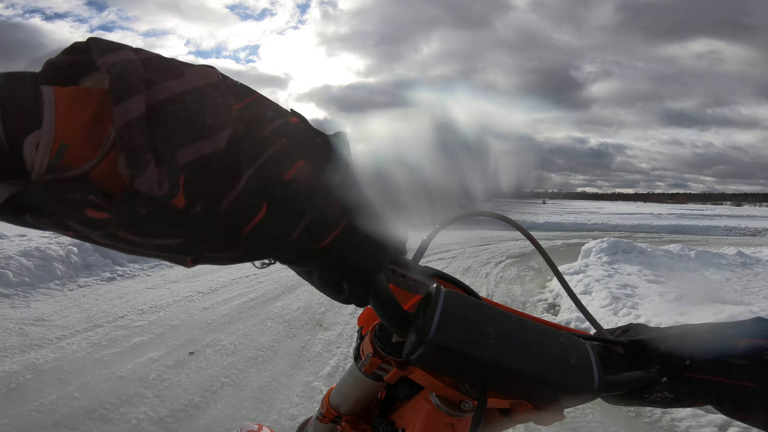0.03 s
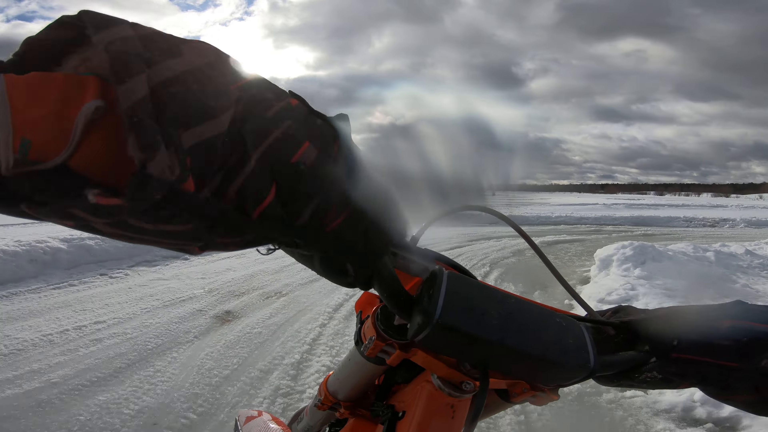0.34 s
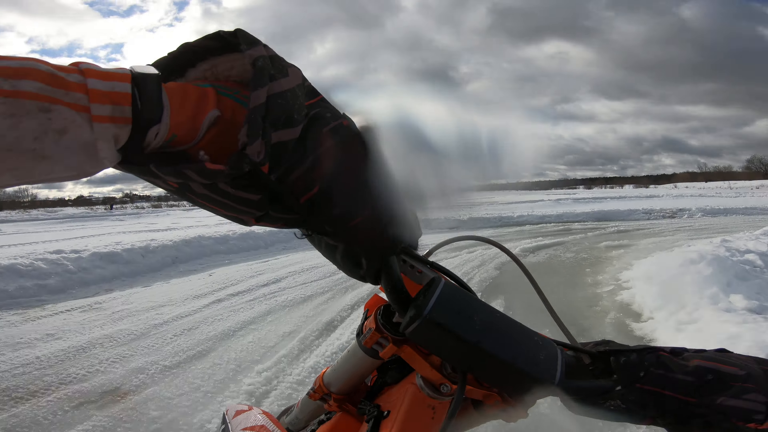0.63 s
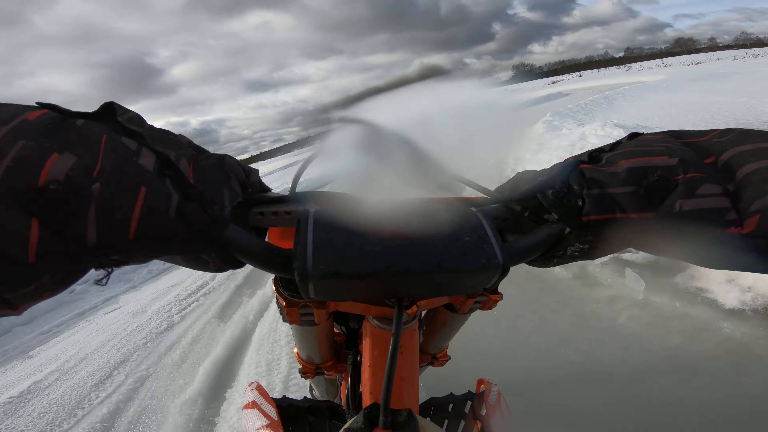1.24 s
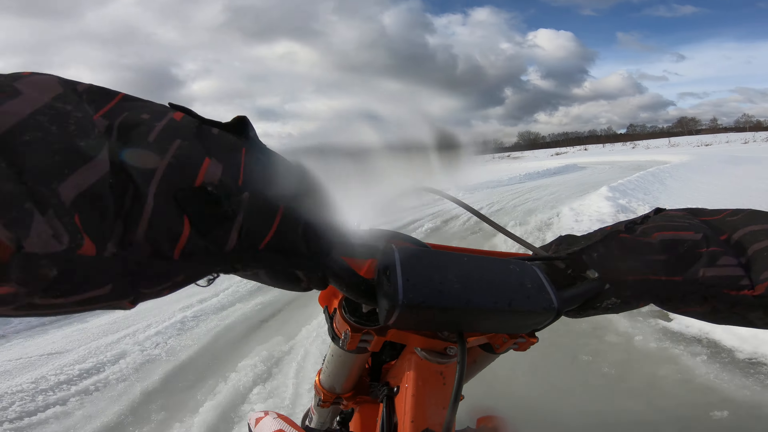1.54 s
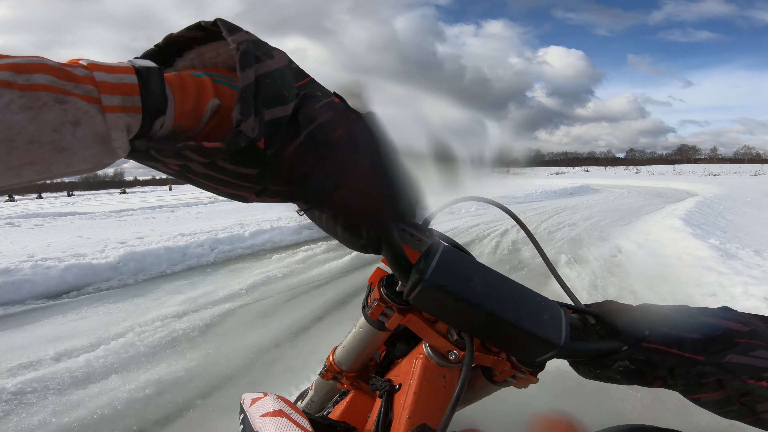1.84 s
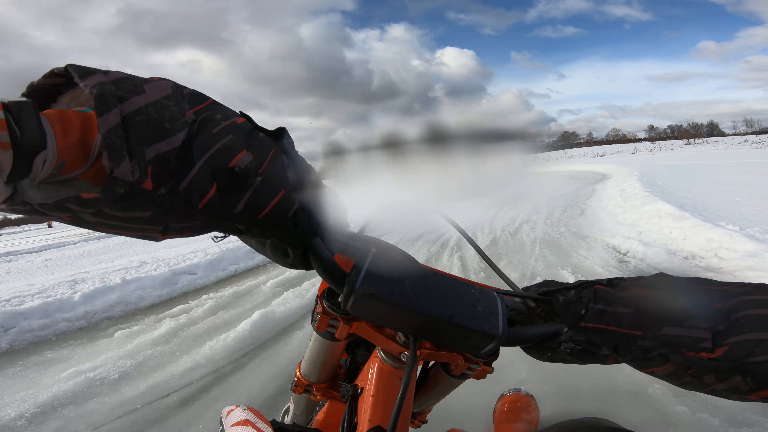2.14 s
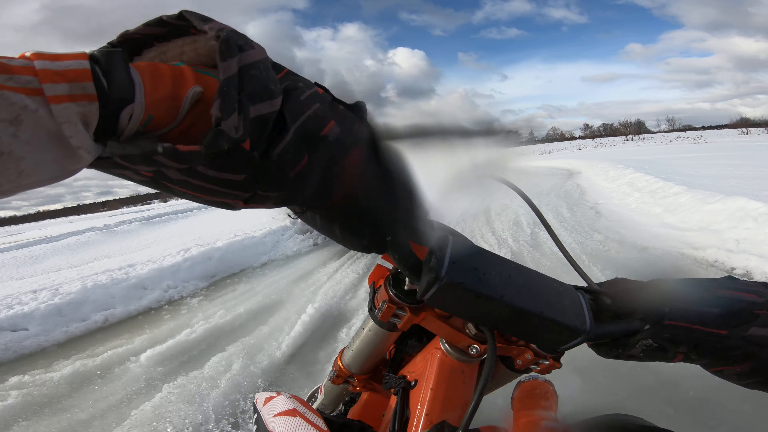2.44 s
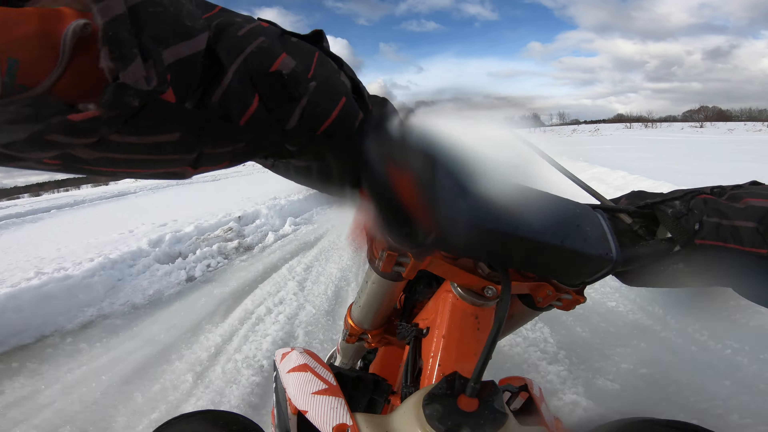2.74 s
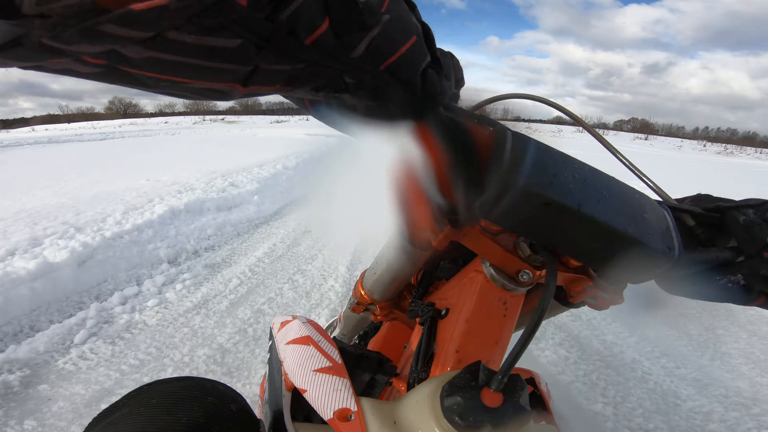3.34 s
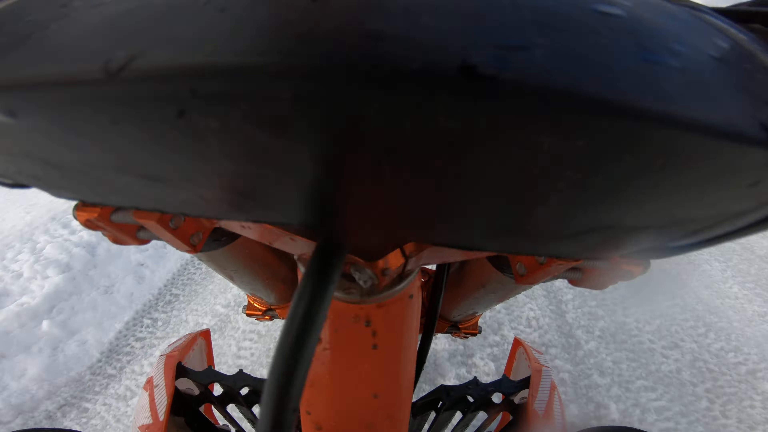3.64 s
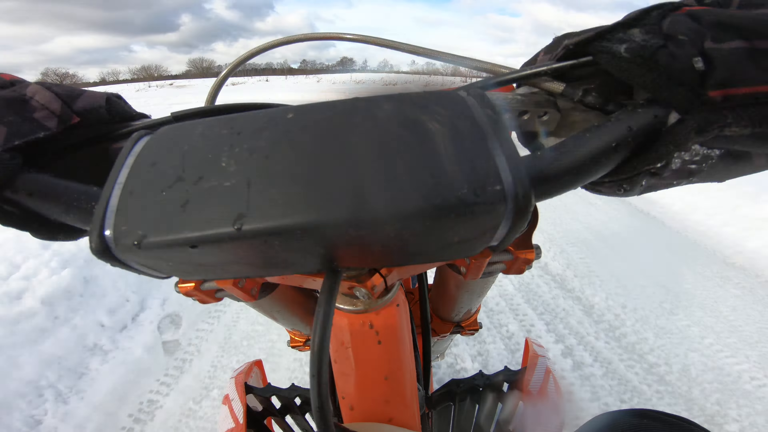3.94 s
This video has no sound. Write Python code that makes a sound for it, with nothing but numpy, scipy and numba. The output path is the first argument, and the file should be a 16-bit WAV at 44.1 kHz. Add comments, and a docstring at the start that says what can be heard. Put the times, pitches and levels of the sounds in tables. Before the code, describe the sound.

A dirt bike engine thumps through a bend, then revs up hard on ice.

```python
"""On an ice track, heard from the chest of a rider on a single-cylinder four-stroke dirt bike.
The exhaust thumps through a bend on short blips of throttle, then the bike pulls away with a hollow
drone from its air intake. The valve gear clatters and the engine's metal cases ring. Studded tyres
scrape and skid on the ice, the frame knocks over ruts and wind buffets the microphone."""
import sys
import numpy as np
from scipy import signal
from scipy.fft import rfft, irfft
from scipy.io import wavfile
from scipy.ndimage import uniform_filter1d, minimum_filter1d
from numba import njit

SR = 44100
rng = np.random.default_rng(int(sys.argv[2]) if len(sys.argv) > 2 else 0)


def transcribe(u):
    """Save the signal u as a 16-bit wav file named by the first command-line argument.

    u: samples, shape (n,) or (channels, n), limited to [-1, 1]; the rate is SR.
    q: integer samples, one column per channel.
    """
    v = np.clip(np.atleast_2d(u).T, -1, 1)
    q = np.round(v * 32767).astype(np.int16)
    wavfile.write(sys.argv[1], SR, q)


N = 176400  # 4 seconds

# Engine speed; one cycle is one firing and two turns of the crank: time_s, firings_per_s
ENGINE_SPEED = [(0.0, 29.71), (0.15, 30.25), (0.29, 35.62), (0.47, 33.31), (0.6, 27.96), (0.75, 26.97),
                (0.91, 35.13), (1.15, 35.09), (1.38, 30.55), (1.57, 30.05), (1.75, 30.62), (1.98, 33.8),
                (2.14, 33.02), (2.3, 35.74), (2.47, 36.17), (2.58, 40.13), (2.7, 38.77), (2.84, 38.43),
                (2.95, 44.95), (3.1, 45.6), (3.24, 45.11), (3.34, 48.98), (3.46, 53.58), (3.6, 54.74),
                (3.78, 57.74), (3.9, 59.51), (4.0, 59.12)]

# How loud each engine sound is: time_s, level_db
BOOM_LEVEL = [(0, -14.5), (.18, -15.5), (.3, -27), (.43, -20.5), (.58, -14), (.78, -16.5), (.92, -19.5),
              (1.15, -24), (1.25, -32.5), (1.5, -19.5), (1.8, -20.5), (2.3, -24), (2.6, -25), (3.3, -26),
              (3.6, -62), (4, -30)]  # exhaust, at each firing
THROB_LEVEL = [(0, -27.5), (.18, -22.5), (.31, -15.5), (.47, -14), (.6, -46), (.8, -17.5), (.95, -17),
               (1.15, -16), (1.28, -23.5), (2, -22), (2.55, -18), (3, -32.5), (3.6, -20), (4, -19.5)]  # exhaust, at each crank turn
HUM_LEVEL = [(2.3, -63), (2.6, -17.5), (2.95, -18.5), (3.3, -16.5), (3.6, -18.5), (4, -19.5)]  # exhaust, pulling steadily
GROWL_LEVEL = [(2.4, -62), (2.6, -40), (2.85, -37), (3.15, -38), (3.4, -42), (3.6, -31), (3.78, -30),
               (3.93, -31), (4, -35)]  # exhaust, working hard
BARK_LEVEL = [(0, -37), (.16, -35.5), (.25, -21.5), (.4, -21), (.55, -28.5), (.75, -34), (.9, -23.5),
              (1.1, -18), (1.21, -17.5), (1.35, -27), (1.75, -33), (1.88, -21), (2.1, -25.5), (2.4, -25.5),
              (2.55, -21), (2.75, -23), (3.2, -31.5), (3.6, -22), (4, -28)]  # intake, throttle partly open
DRONE_LEVEL = [(2.3, -46), (2.52, -25), (2.66, -18), (2.8, -13.5), (2.88, -12), (2.97, -15), (3.07, -14),
               (3.2, -9), (3.34, -9), (3.48, -10.5), (3.57, -13), (3.75, -13), (3.9, -11), (4, -15)]  # intake, throttle wide open
CLATTER_LEVEL = [(0, -68), (.3, -45), (.7, -54.5), (1, -46.5), (1.4, -49.5), (1.75, -54.5), (2, -48.5),
                 (2.5, -42.5), (2.85, -44.5), (3.1, -38.5), (3.35, -43), (3.55, -35), (3.75, -36),
                 (3.92, -35), (4, -48)]  # valve gear
CASE_LEVEL = [(0, -58), (2.5, -54), (2.9, -46), (3.4, -50), (3.6, -41), (3.78, -37), (3.93, -37), (4, -42)]  # metal engine cases

# The intake's bark, rising with each blip of throttle: time_s, pitch_hz
BARK_PITCH_CURVE = [(0, 278), (.2, 285), (.36, 320), (.48, 343), (.57, 293), (.72, 305), (.8, 358),
                    (.95, 346), (1.15, 301), (1.45, 325), (1.62, 298), (1.95, 323), (2.23, 306),
                    (2.45, 352), (2.7, 320), (3.6, 341.6)]
# The note of the airbox, the chamber the engine breathes through: time_s, pitch_hz, width_hz
AIRBOX_NOTE = [(2.6, 278, 50), (2.84, 274, 45), (2.96, 294, 70), (3.12, 288, 70), (3.24, 282, 68),
               (3.44, 298, 74), (3.6, 298, 100), (3.88, 282, 90), (4, 250, 90)]
# The notes the engine cases ring at: pitch_hz, width_hz, gain_db
CASE_NOTES = [(1060, 60, -1), (1312, 55, 5), (1660, 70, -2), (1900, 70, -10), (2540, 130, -9),
              (2815, 60, -8), (3740, 130, -18), (5800, 170, -22)]
# Tyres rolling on ice: time_s, scrape_db, crunch_db, spray_db
TYRE_LEVELS = [(0, -51, -63, -48), (.35, -48.5, -57.5, -57), (.6, -43.5, -60.5, -56),
               (.95, -46.5, -70.5, -49), (1.15, -43, -61.5, -50.5), (1.4, -46.5, -59.5, -59.5),
               (1.58, -45.5, -58, -53.5), (1.68, -44, -58, -50.5), (1.95, -39.5, -46.5, -48.5),
               (2.15, -40.5, -49, -56), (2.45, -35.5, -43, -56), (2.65, -34, -49, -55),
               (2.85, -35, -49, -59), (3.05, -35, -44.5, -54.5), (3.35, -39, -50.5, -51),
               (3.55, -34.5, -50, -51), (3.75, -39, -47, -49), (4, -35, -51.5, -46.5)]
# Tyres sliding: time_s, pitch_hz, width_hz, level_db
TYRE_SKID = [(0, 1150, 450, -52), (.3, 1150, 400, -46), (.55, 1200, 400, -52), (.7, 1200, 350, -45),
             (.82, 1100, 450, -49), (.97, 1130, 400, -41.5), (1.15, 1080, 450, -47), (1.4, 1100, 400, -62),
             (2.7, 1090, 120, -56), (2.85, 1090, 70, -40), (3.0, 1090, 90, -45), (3.15, 1070, 60, -42),
             (3.22, 1030, 60, -46), (3.3, 1020, 50, -38.5), (3.42, 1010, 70, -54), (3.6, 1010, 70, -65)]
# Knocks over ruts: start_s, blow_db, rattle_db, rattle_decay_s
RUT_KNOCKS = [(1.277, -14, -38, .004), (1.663, -7, -39, .003), (1.81, -18, -37, .009),
              (1.907, -13, -34, .007), (2.632, -10, -25, .03), (2.735, -18, -32, .022),
              (2.838, -10, -29, .006), (3.057, -12, -32, .004), (3.51, -10, -27, .03),
              (3.546, -9, -26, .035), (3.64, -9, -32, .005), (3.745, -6, -25, .005)]
# Wind on the microphone: time_s, level_db
WIND_LEVEL = [(0, -29), (.4, -25), (.7, -27), (1.1, -23), (1.35, -26), (1.7, -21), (2.25, -19), (2.55, -22),
              (2.7, -26), (2.84, -21), (2.95, -28), (3.45, -30), (3.57, -19.5), (3.7, -26), (3.8, -20.5),
              (3.88, -29), (4, -29)]

# The tone of each sound, or how strong its lows and highs are: frequency_hz, relative_db
BOOM_TONE = [(5, -68), (25, -36.5), (55, -14.5), (88, -5.5), (108, -1), (118, 3), (135, -1), (160, -27.5),
             (230, -29.5), (300, -21), (400, -50), (900, -92), (3000, -110)]
THROB_TONE = [(5, -68.5), (25, -25.5), (58, 2), (72, 3), (115, -7.5), (140, -2), (180, -20.5), (260, -27.5),
              (450, -38), (1500, -100)]
GROWL_TONE = [(250, -24.5), (380, 3.5), (470, 9.5), (560, -5.5), (680, 3.5), (800, -6.5), (1020, -3.5),
              (1150, -11), (1310, -7), (1500, -13.5), (2500, -24.5), (6000, -57), (15000, -87)]
BARK_TONE = [(90, -7.5), (190, -1.5), (240, 13), (305, 12), (355, 11), (400, 10.5), (450, -7), (600, -36),
             (1200, -25.5), (4000, -44.5)]
DRONE_TONE = [(20, -40), (80, -12), (180, 5), (228, 6.5), (275, 4.5), (320, 1), (362, -7), (410, 5),
              (470, -9.5), (600, 5.5), (720, -8.5), (1500, -66.5), (4000, -97.5)]
CLATTER_TONE = [(300, -4.5), (550, 0.5), (820, 2), (1060, -2), (1180, -1.5), (1310, 1), (1470, -1),
                (1660, -3.5), (2200, -5.5), (2800, -25.5), (3150, -30.5), (3750, -21), (4600, -18),
                (5800, -22.5), (7200, -36.5), (9300, -48), (11000, -63)]
SCRAPE_TONE = [(200, -1), (480, 10), (750, -2.5), (1050, 6), (1300, 0.5), (1550, -12), (1900, -5.5),
               (2600, -38), (3200, -19), (6000, -62.5)]
CRUNCH_TONE = [(600, 0), (1500, 0.5), (2100, 5.5), (2650, 6), (3100, -6), (3800, -2.5), (4600, -24.5),
               (7000, -34), (11000, -61.5)]
SPRAY_TONE = [(2000, 5.5), (3200, -4), (3800, -1.5), (4500, -6.5), (5400, -2), (5900, 1.5), (6400, -1.5),
              (7300, -18.5), (8800, -15.5), (10000, -30), (15000, -53)]
BLOW_TONE = [(150, -12), (450, 3), (1000, 2), (1600, -3), (2200, -18), (6000, -52), (15000, -80)]
RATTLE_TONE = [(150, -29.5), (400, 5), (700, 5), (1300, -16), (2000, -9.5), (3000, -29.5), (6000, -41),
               (10000, -66)]
WIND_TONE = [(12, -15), (27, -11.5), (42, -1.5), (65, -10), (95, -3.5), (130, -8), (180, -10), (300, -17),
             (450, -26.5), (900, -61.5), (2000, -94.5)]

# When each sound comes, as a share of one engine cycle
CLATTER_AT, GROWL_AT, DRONE_AT, BOOM_AT, BARK_AT = 0.45, 0.51, 0.5473, 0.8045, 0.91
THROB_AT, HUM_AT = 0.843, 0.18  # as a share of one crank turn


def exhaust(cycle):
    """Each firing booms in the silencer and each crank turn throbs; a steady pull brings a hum."""
    turns = 2 * cycle
    boom = steady(colour(pulses(cycle, BOOM_AT, jitter_s=0.00077, scatter_db=1), BOOM_TONE))
    throb = steady(colour(pulses(turns, THROB_AT, jitter_s=0.00072, scatter_db=4), THROB_TONE))
    hum = np.sqrt(2) * np.sin(2 * np.pi * (turns - HUM_AT))
    hum *= from_db(curve(HUM_LEVEL) + 0.7 * wander(12))
    return boom * loudness(BOOM_LEVEL) + throb * loudness(THROB_LEVEL) + hum


def exhaust_growl(cycle):
    """When the engine works hard, its exhaust pulses sharpen and their overtones stand out."""
    sharp_pulses = pulses(cycle, GROWL_AT, jitter_s=0.00002, scatter_db=3)
    return steady(colour(sharp_pulses, GROWL_TONE)) * loudness(GROWL_LEVEL)


def intake_bark(cycle):
    """On part throttle the intake barks roughly, with a weaker rebound a third of a cycle later."""
    uneven_cycle = cycle + 0.024 * wander(14)
    rebounds = from_db(-14) * pulses(uneven_cycle, BARK_AT + 0.33, jitter_s=0.0012, scatter_db=4.5)
    barks = pulses(uneven_cycle, BARK_AT, jitter_s=0.00038, scatter_db=1)
    airflow = steady(barks + rebounds) + from_db(-17.5) * noise()
    ringing = ring(airflow, curve(BARK_PITCH_CURVE), width_hz=np.full(N, 130.0))
    return steady(colour(ringing, BARK_TONE)) * loudness(BARK_LEVEL)


def intake_drone(cycle):
    """With the throttle wide open, the airbox rings from one gulp of rushing air to the next."""
    gulps = steady(pulses(cycle, DRONE_AT, jitter_s=0.00006, scatter_db=1.5))
    airflow = gulps + from_db(-21) * noise()
    ringing = ring(airflow, curve(AIRBOX_NOTE), width_hz=curve(AIRBOX_NOTE, column=2))
    return steady(colour(ringing, DRONE_TONE)) * loudness(DRONE_LEVEL)


def valve_clatter(cycle):
    """Valve gear and rasping gas make a burst each cycle, partly the same every time."""
    random_share, decay_cycles = 0.53, 0.42
    pattern = rng.standard_normal(1600)
    taps = pulses(cycle, CLATTER_AT, jitter_s=0.00003, scatter_db=2.5)
    repeating = steady(signal.fftconvolve(taps, pattern)[:N])
    rasp = np.sqrt(1 - random_share) * repeating + np.sqrt(random_share) * noise()
    cycles_since_tap = (cycle - CLATTER_AT) % 1
    bursts = 1 + np.exp(-cycles_since_tap / decay_cycles)  # the 1 keeps it going between bursts
    return colour(rasp * bursts, CLATTER_TONE) * loudness(CLATTER_LEVEL)


def engine_cases(cycle):
    """Each firing rings the metal cases, most loudly when the engine works hard."""
    shaking = steady(pulses(cycle, CLATTER_AT, jitter_s=0.00003, scatter_db=1.5)) + 0.85 * noise()
    notes = sum(from_db(db) * ring(shaking, np.full(N, float(hz)), np.full(N, float(width)))
                for hz, width, db in CASE_NOTES)
    return steady(notes) * loudness(CASE_LEVEL)


def tyres():
    """Studs scrape and crunch through the ice and throw up a hissing spray."""
    scrape = colour(noise(), SCRAPE_TONE)
    scrape *= from_db(curve(TYRE_LEVELS, column=1) + 2.3 * wander(40))
    crunch = colour(ice_chips() + 0.1 * noise(), CRUNCH_TONE)
    crunch *= from_db(curve(TYRE_LEVELS, column=2) + 2.0 * wander(25))
    spray = colour(ice_chips() + 0.46 * noise(), SPRAY_TONE)
    spray *= from_db(curve(TYRE_LEVELS, column=3) + 1.5 * wander(38))
    return scrape + crunch + spray


def skid():
    """Sliding studs stick and slip: a rasp in the bend, a squeal as the rear wheel spins up."""
    slips = ice_chips() + 0.059 * noise()
    squeal = ring(slips, curve(TYRE_SKID), width_hz=curve(TYRE_SKID, column=2))
    return steady(squeal) * loudness(TYRE_SKID, column=3)


def ice_chips(chips_per_s=1800):
    """Many tiny cracks where the studs bite the ice."""
    cracks = (rng.random(N) < chips_per_s / SR) * noise()
    boost_db = 2 * np.minimum(rng.exponential(size=N), 3)
    return cracks * from_db(boost_db)


def knocks():
    """Over a rut the frame takes one hard blow, then rattles briefly."""
    t = np.arange(N) / SR
    blows, shaking = np.zeros(N), np.zeros(N)
    for start_s, blow_db, rattle_db, decay_s in RUT_KNOCKS:
        blows[int(start_s * SR)] += from_db(blow_db)
        shaking += from_db(rattle_db) * (t >= start_s) * np.exp(-np.abs(t - start_s) / decay_s)
    rattle = shaking * noise()
    return colour(blows, BLOW_TONE) * np.std(blows) + colour(rattle, RATTLE_TONE) * np.std(rattle)


def wind():
    """Gusts buffet the microphone with a low rumble."""
    gust_db = wander(16)
    return steady(colour(noise(), WIND_TONE)) * from_db(curve(WIND_LEVEL) + gust_db)


def pulses(cycle, at, jitter_s, scatter_db):
    """One click per cycle, uneven in timing (jitter) and strength (scatter)."""
    count = 400
    timing_error, strength_error = rng.standard_normal((count, 2)).T
    due_cycles = np.arange(count) + at - 1
    due_samples = np.interp(due_cycles, cycle, np.arange(N), left=0, right=2 * N)
    position = np.abs(due_samples + jitter_s * SR * timing_error)
    inside = position < N - 1
    sample, fraction = position[inside].astype(int), position[inside] % 1
    size = from_db(scatter_db * strength_error[inside])
    # Share each click between the two nearest samples.
    return np.bincount(sample, size * (1 - fraction), N) + np.bincount(sample + 1, size * fraction, N)


@njit
def ring(x, pitch_hz, width_hz):
    """Make x ring at a pitch that may move; a smaller width gives a purer note."""
    y = x + 1e-18
    for _ in range(2):  # two band-pass filters in a row
        band_state, low_state = 0., 0.
        for i in range(len(x)):
            tuning = np.tan(np.pi * pitch_hz[i] / SR)
            damping = width_hz[i] / pitch_hz[i]
            band = (band_state + tuning * (y[i] - low_state)) / (1 + tuning * (tuning + damping))
            band_state = 2 * band - band_state
            low_state += 2 * tuning * band
            y[i] = damping * band
    return y


def colour(x, tone):
    """Give x the lows and highs of a tone table, at an overall level of 1."""
    size, half = 16384, 8192
    hz, db = np.array(tone, float).T
    grid_hz = np.arange(half + 1) * SR / size
    gain = from_db(np.interp(np.log(grid_hz + 1), np.log(hz), db))
    # Build a filter that rings only after a tap, never before it (minimum phase).
    cepstrum = irfft(np.log(gain))[:half]
    cepstrum[1:] *= 2
    tap_response = irfft(np.exp(rfft(cepstrum, size)))[:half]
    y = signal.fftconvolve(x, tap_response)[:N]
    return y / np.std(y)


def steady(x):
    """Even out slow changes in loudness, so that a level table can set it."""
    return x / np.sqrt(smooth(x * x, 6000) + 1e-9)


def wander(steps_per_s):
    """A smooth random drift with a typical size of 1."""
    step = int(SR / steps_per_s)
    drift = smooth(np.repeat(rng.standard_normal(2000), step)[:N], step)
    return drift / np.std(drift)


def smooth(x, samples):
    return uniform_filter1d(uniform_filter1d(x, samples), samples)


def curve(table, column=1):
    """One column of a table, joined by straight lines in time."""
    rows = np.array(table, float)
    return np.interp(np.arange(N) / SR, rows[:, 0], rows[:, column])


def loudness(table, column=1):
    return from_db(curve(table, column))


def from_db(db):
    return 10 ** (np.asarray(db) / 20)


def noise():
    return rng.standard_normal(N)


def scene():
    """Engine, tyres, knocks and wind, mixed into one channel."""
    cycle = np.cumsum(curve(ENGINE_SPEED)) / SR  # engine cycles so far
    engine = exhaust(cycle) + exhaust_growl(cycle) + intake_bark(cycle) + intake_drone(cycle)
    engine += valve_clatter(cycle) + engine_cases(cycle)
    return (engine + tyres() + skid() + knocks() + wind())[None]


def record(dry):
    """A limiter turns down the loudest peaks, then the highest treble is cut."""
    ceiling, hold_samples, top_hz = 0.76, 400, 15700
    needed_gain = ceiling / np.maximum(np.abs(dry), ceiling)
    gain = uniform_filter1d(minimum_filter1d(needed_gain, hold_samples), hold_samples)
    treble_cut = signal.ellip(8, 0.2, 70, top_hz, fs=SR, output="sos")
    return signal.sosfilt(treble_cut, dry * gain)


dry = scene()
out = record(dry)
transcribe(out)
```